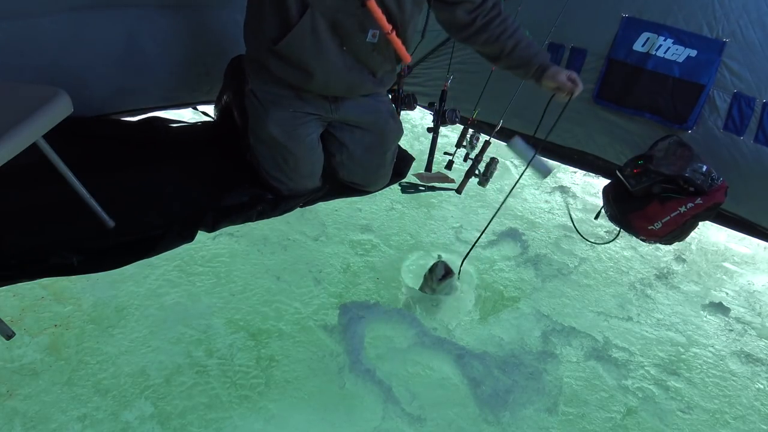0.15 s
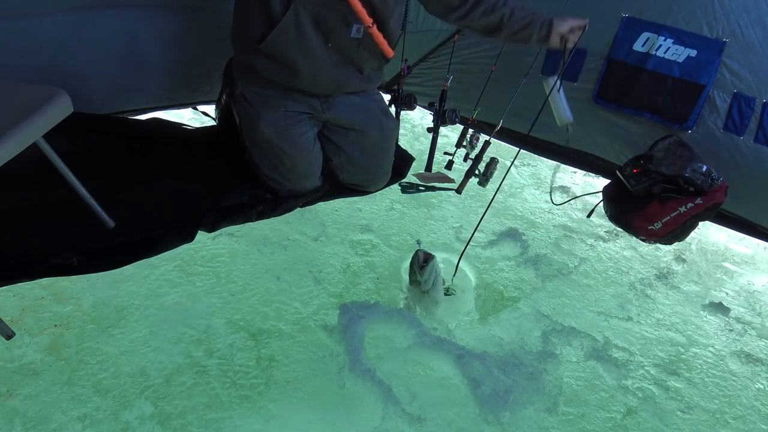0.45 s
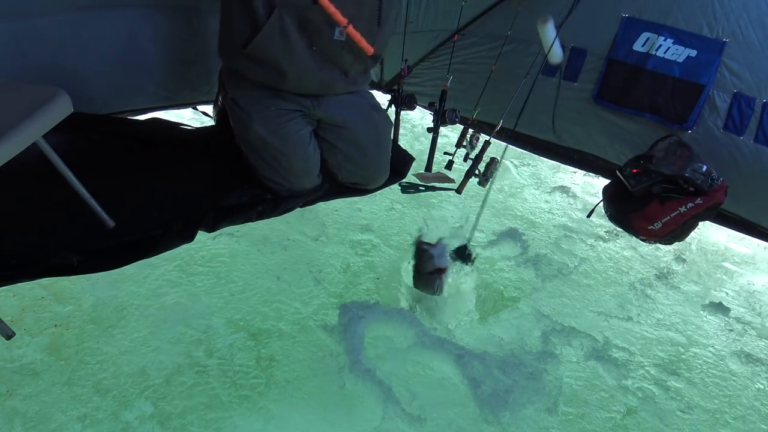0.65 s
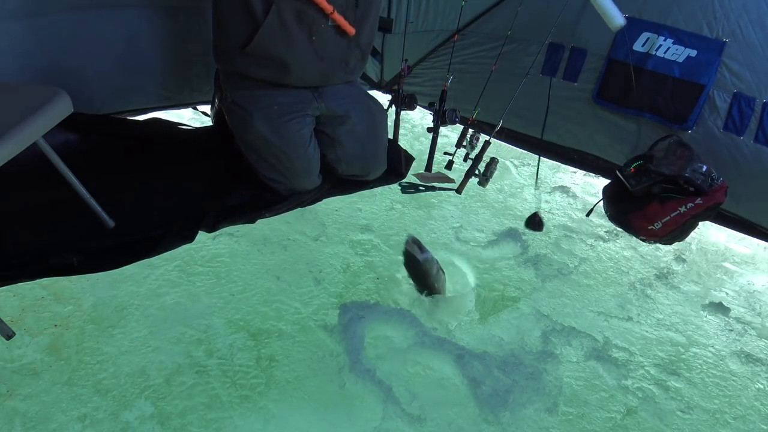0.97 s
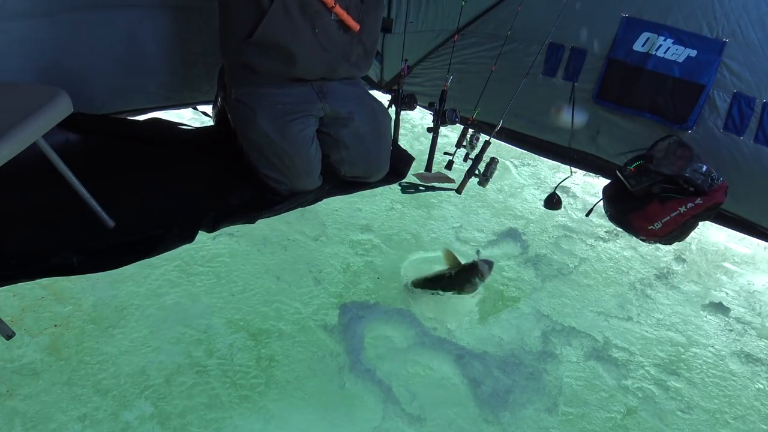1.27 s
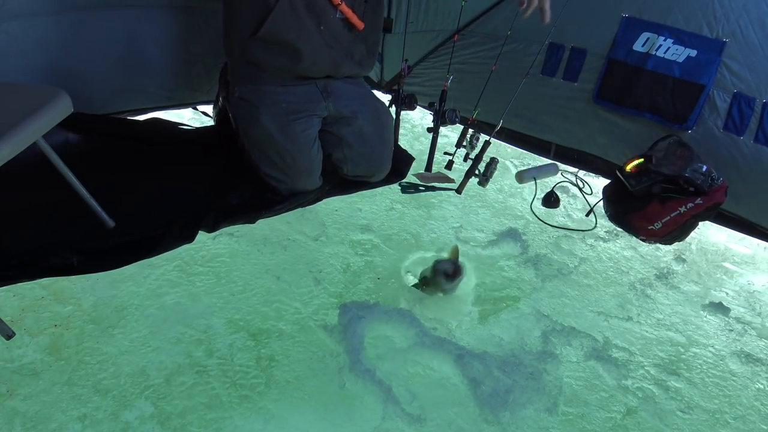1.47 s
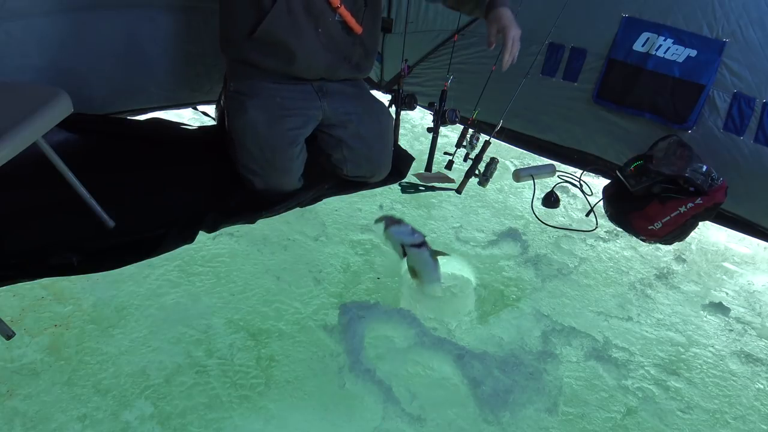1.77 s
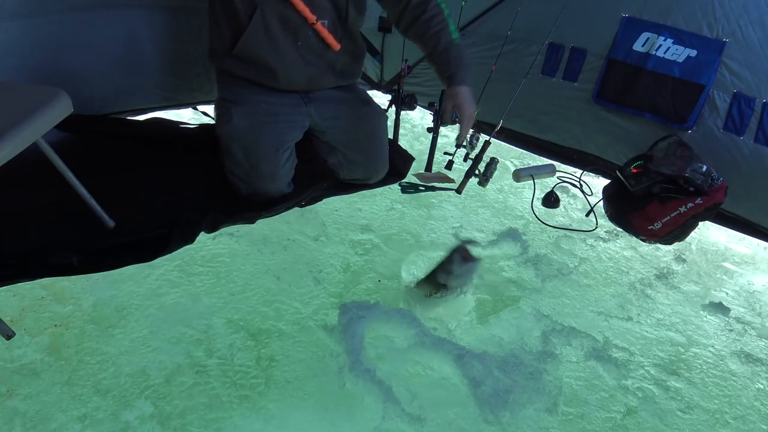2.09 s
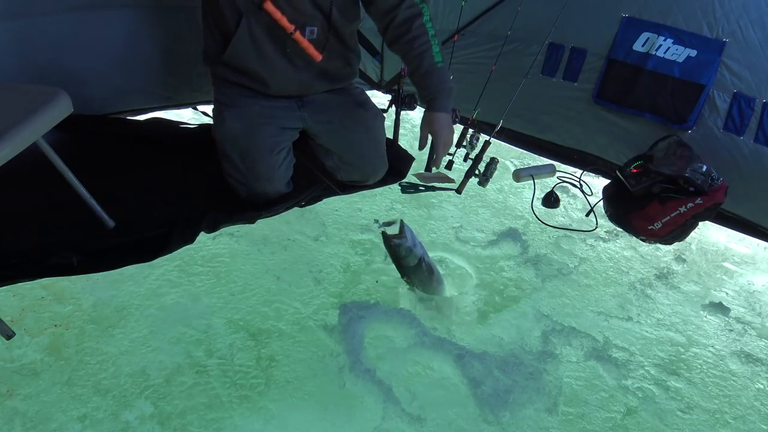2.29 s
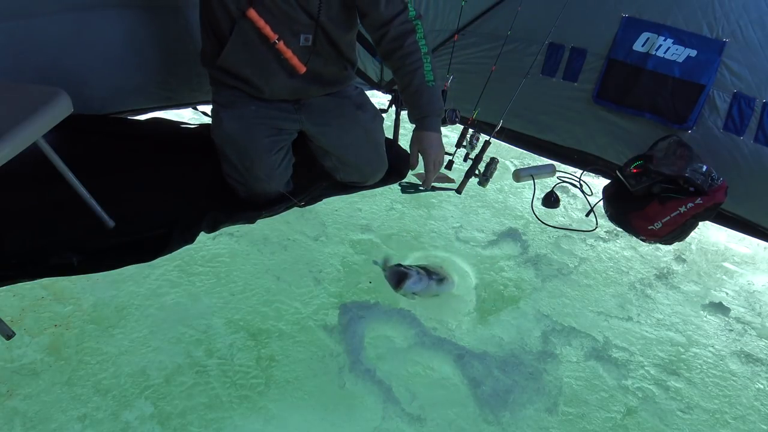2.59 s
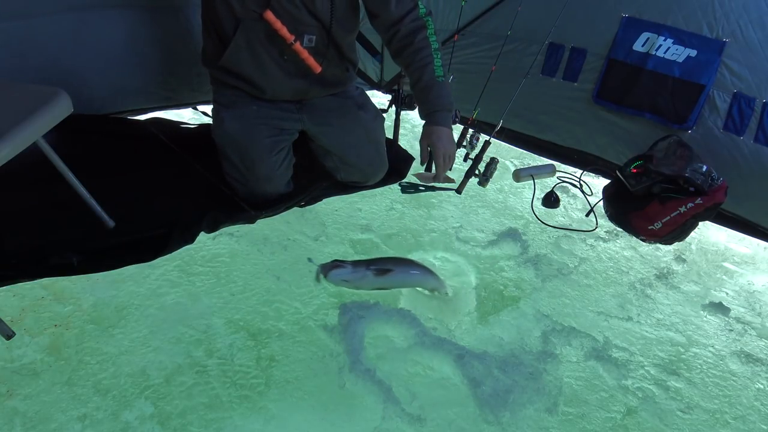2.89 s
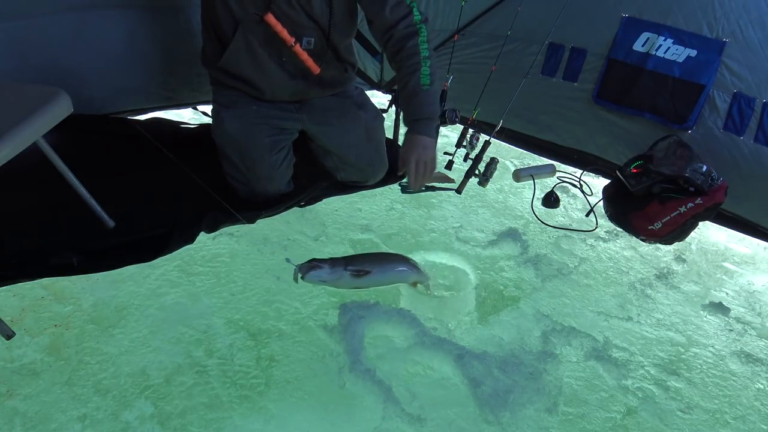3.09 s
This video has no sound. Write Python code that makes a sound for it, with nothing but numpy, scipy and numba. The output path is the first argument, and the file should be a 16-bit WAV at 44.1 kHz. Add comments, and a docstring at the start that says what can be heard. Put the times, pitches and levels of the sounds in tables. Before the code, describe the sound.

A large fish thrashes in an ice hole inside a small fabric shelter. A line swishes and briefly sings, then water sloshes, gurgles and sprays as the fish slaps repeatedly on wet ice, heard close over a faint low rumble.

```python
"""A large fish is hauled up through a hole in the ice and flops about inside a fabric shelter.
The line swishes and sings, water sloshes and gulps in the hole, and spray patters down.
The fish slaps and thumps on the wet ice, air pockets squelch as they are squeezed, and tackle clinks.
The wet textures are clouds of tiny ringing bubbles and droplets; a low rumble lies under it all."""
import sys
import numpy as np
from scipy import signal
from scipy.fft import rfft, irfft, next_fast_len
from scipy.io import wavfile
from numba import njit

SR = 44100
rng = np.random.default_rng(int(sys.argv[2]) if len(sys.argv) > 2 else 0)


def file_out(sig):
    """Save sig as 16-bit WAV at sys.argv[1]."""
    # one column per channel
    cols = np.atleast_2d(sig).T
    # limit, then scale
    lim = np.clip(cols, -1, 1)
    pcm = np.round(lim * 32767).astype(np.int16)
    wavfile.write(sys.argv[1], SR, pcm)


N = 143325
T = np.arange(N) / SR

# Fader rides: time_s, level_db
SLOSH_RIDE = [(0, -37.5), (.1, -54), (.3, -31), (.48, -30), (.58, -32), (.68, -25), (.8, -29), (.92, -27),
              (1.02, -32.5), (1.25, -41.5), (1.6, -40), (1.85, -40.5), (2.0, -34.5), (2.17, -51),
              (2.42, -44), (2.8, -46), (3.1, -43), (3.25, -51)]  # water in the hole
SLUSH_RIDE = [(0, -38.5), (.04, -57), (.2, -42), (.45, -44), (.63, -37), (.72, -47), (.82, -33.5),
              (.88, -34), (.92, -26), (1.17, -32.5), (1.43, -40), (1.52, -37), (1.89, -41), (1.97, -32.5),
              (2.45, -43.5), (2.72, -52), (2.81, -59), (2.99, -47.5), (3.08, -34.5), (3.25, -48)]  # slush around the fish
SPRAY_RIDE = [(0, -41.5), (.05, -49), (.2, -51), (.45, -49), (.6, -44.5), (.87, -39.5), (1.0, -33),
              (1.1, -27.5), (1.22, -35.5), (1.33, -36.5), (1.445, -42.5), (1.5, -31), (1.6, -38.5),
              (1.76, -50), (2.12, -44.5), (2.65, -49.5), (2.82, -58.5), (3.1, -48.5), (3.25, -45.5)]  # fine spray falling back
DRONE_RIDE = [(0, -55.5), (1.9, -48.5), (2.3, -46), (2.62, -37), (2.9, -40), (3.25, -50)]  # the low drone's swell
SING_RIDE = [(.2, -56), (.39, -37), (.52, -33.5), (.63, -32.5), (.72, -54), (.9, -110)]  # taut line and rod

# EQ curves that colour each texture: frequency_hz, gain_db
RUMBLE_EQ = [(20, -8), (32, 4), (45, -6), (65, -1.5), (84, -1.5), (103, 7.5), (125, 3), (160, -6.5),
             (220, -6), (500, -13), (1500, -52), (15000, -62)]
SLOSH_EQ = [(120, -12), (220, -14.5), (285, -9), (400, -3.5), (520, -1), (820, 2.5), (1000, 2), (1150, 1.5),
            (1400, -3), (1850, -8), (2400, -14), (4000, -70)]
SLUSH_EQ = [(700, -3), (1600, 8), (2400, 6), (3300, 10.5), (4300, 4), (5400, 1.5), (7000, -12.5),
            (16000, -51)]
SPRAY_EQ = [(1500, -42), (3500, 0), (5200, 7), (7000, 2.5), (9000, 0.5), (12500, -1.5), (16000, -8)]
SWISH_EQ = [(120, -8), (220, -12.5), (450, -8.5), (850, -3.5), (1250, -3), (1900, -4), (2600, -4),
            (3400, -3), (4400, -7), (5400, -7), (7000, -15), (8700, -16), (10500, -19), (15500, -25)]
BODY_EQ = [(100, -52), (240, -12), (330, -8), (500, 1.5), (850, 6.5), (1400, -0.5), (2200, 2.5),
           (4000, -36)]
SMACK_EQ = [(600, -51), (1300, -5), (2100, 0.5), (3200, 6), (4400, -0.5), (5500, -2.5), (7000, -12.5),
            (16000, -72)]
FIZZ_EQ = [(1500, 4.5), (2500, -9), (3500, 12), (5300, -21), (8000, -4), (10000, -19)]
DRIP_EQ = [(3000, -21), (5500, 3.5), (8300, 6), (11000, -8.5), (16000, -11)]
DROP_EQ = [(1000, -23), (5000, -10), (9000, 5.5), (13000, 2), (16000, -1)]

# Air rings in the water and under the fish:
# start_s, pitch_hz, level_db, swell_s, decay_s, glide_octaves_per_s
AIR_POCKETS = [(.002, 1630, -35, 0.0088, 0.013, -4), (0.072, 3110, -29.5, 0.0033, 0.028, 0.5),
               (0.186, 1270, -24, 0.0051, 0.0086, -8.5), (0.224, 399, -28.5, 0.0051, 0.0097, 4),
               (.604, 760, -24.5, 0.0037, 0.0099, 2.5), (.652, 1054, -16.5, 0.0046, 0.0055, 16),
               (.652, 2404, -14, 0.0018, 0.0075, -3), (0.684, 958, -11.5, 0.0049, 0.0016, 4),
               (.695, 799, -10.5, 0.0013, 0.0083, -3), (.692, 2970, -20, 0.0052, 0.0063, 0),
               (0.712, 5100, -17.5, 0.0007, 0.0045, 7), (0.719, 1120, -16, 0.003, 0.0044, 11),
               (0.728, 2760, -15, 0.0021, 0.0042, -17), (0.741, 900, -6.5, 0.00066, 0.0017, -12),
               (0.756, 950, -11, 0.0055, 0.0071, -4), (0.877, 1197, -21, .003, 0.0051, 3),
               (.892, 1940, -18, 0.0018, 0.0039, -1), (.893, 3710, -19, 0.0017, 0.005, -1),
               (1.055, 742, -12.5, 0.0018, 0.0065, 14), (1.077, 880, -24, 0.0052, 0.01, 7),
               (1.137, 2834, -14.5, 0.0022, 0.0077, 4), (1.339, 948, -27.5, 0.014, 0.011, 1),
               (1.650, 2113, -24.5, 0.0069, 0.026, -3), (1.67, 1365, -20.5, 0.0072, 0.0075, -10.5),
               (1.911, 812, -16.5, 0.003, 0.0092, -15), (1.915, 805, -13, 0.017, 0.01, 2),
               (1.929, 2780, -15, 0.00093, 0.0052, 10), (1.932, 3250, -19.5, 0.0024, 0.0067, 7),
               (1.944, 818, -22, 0.0057, 0.011, 1.5), (2.020, 1120, -27, 0.017, .02, -1.5),
               (2.047, 1117, -19, .008, 0.032, 6.5), (2.072, 1244, -12, 0.0049, 0.0034, -3),
               (2.08, 1003, -16.5, 0.0019, 0.014, 4.5), (2.2025, 781, -30, 0.0029, 0.022, -1),
               (2.206, 1586, -28, 0.01, 0.013, -0.5), (2.264, 1276, -24.5, 0.0014, 0.052, 2),
               (2.311, 1760, -20.5, 0.0025, 0.011, -0.5), (2.3343, 1150, -13.5, 0.0008, 0.0071, 1.5),
               (2.349, 1155, -19.5, 0.011, 0.015, -4.5), (2.517, 1222, -23.5, 0.0062, 0.012, 2),
               (2.543, 3600, -30, .002, .008, 2), (2.621, 696, -10.5, 0.0055, 0.0068, 5.5),
               (2.647, 710, -21, 0.0073, 0.0092, -1), (2.682, 2010, -17, 0.0011, 0.013, -0.5),
               (2.688, 1543, -23, 0.0039, 0.013, -2.5), (2.713, 318, -36, 0.0048, 0.025, 1),
               (2.719, 2510, -24, 0.0016, 0.011, -3.5), (2.863, 467, -33, 0.011, 0.012, -11)]
# The fish hits water or wet ice: start_s, rise_s, decay_s, body_db, smack_db, spray_db
FISH_SLAPS = [(0.073, 0.0022, 0.044, -38, -31, -40), (.203, 0.0056, 0.033, -45, -47, -27),
              (0.58, 0.0048, 0.028, -26.5, -33, -57), (0.651, 0.0025, 0.078, -38, -21, -32.5),
              (0.6874, 0.0012, 0.033, -26.5, -37, -33), (0.695, 0.00077, 0.0016, -24, -27, -32),
              (0.743, 0.0013, 0.0033, -23, -15.5, -41), (0.755, 0.0015, 0.0083, -36, -40, -32),
              (0.894, 0.0011, 0.044, -26, -29.5, -51), (0.938, 0.0034, 0.026, -26, -35, -36),
              (1.01, 0.0012, 0.0061, -37, -22.5, -20.5), (1.043, 0.002, 0.032, -28.5, -30, -17.5),
              (1.05, 0.004, 0.0099, -29, -20.5, -21.5), (1.138, 0.003, 0.025, -32.5, -19.5, -25),
              (1.188, 0.0041, 0.063, -63, -32.5, -28), (1.335, 0.0052, 0.019, -39, -25.5, -51),
              (1.4484, 0.0021, 0.0043, -18, -19, -18), (1.45, 0.0011, 0.044, -26, -22, -22),
              (1.537, 0.012, 0.0029, -43, -54, -29), (1.667, 0.01, 0.03, -33, -34.5, -42),
              (1.849, 0.0035, 0.022, -31, -36, -63), (1.931, 0.0004, 0.0014, -20, -13.5, -33),
              (1.932, 0.0011, 0.026, -23.5, -30.5, -52), (2.043, .003, 0.035, -55, -26.5, -46),
              (2.077, 0.0034, 0.0019, -11.5, -17.5, -18.5), (2.084, 0.0064, 0.023, -22.5, -26.5, -25),
              (2.171, .003, 0.047, -36, -66, -54), (2.202, 0.0017, 0.0068, -28, -52, -68),
              (2.263, 0.0018, 0.045, -62, -28, -50), (2.28, 0.0033, 0.042, -58, -33, -41.5),
              (2.307, 0.0035, 0.05, -40, -40, -34.5), (2.3315, 0.0008, 0.0022, -48, -30, -48),
              (2.389, 0.013, 0.037, -32.5, -37.5, -46), (2.505, .003, 0.0078, -65, -31.5, -50),
              (2.541, 0.0023, 0.011, -33.5, -37, -60), (2.612, 0.0073, 0.061, -38, -34.5, -38),
              (2.682, 0.00073, 0.02, -24, -24, -37), (2.851, 0.031, 0.04, -37, -44, -46.5),
              (3.110, 0.018, 0.018, -54, -31, -60)]
# Small metal tackle clinks: start_s, pitch_hz, level_db
TACKLE_CLINKS = [(0.0747, 12450, -29), (1.636, 10400, -26.5), (1.6464, 10400, -29.5)]
# Modes of the taut line and rod: pitch_hz, relative_db
LINE_MODES = [(280, -9), (835, -6), (1152, -1.5), (1600, -19), (1820, -10), (2170, -12), (2690, -15),
              (3290, -6)]
# Single drops land: start_s, relative_db
DROP_HITS = [(0.518, -21.5), (.745, -17), (1.410, -24), (1.476, -17), (1.547, -10.5), (1.647, -16),
             (1.869, -29), (1.912, -21), (2.050, -28), (2.0759, -11), (2.079, -13), (2.492, -30),
             (2.559, -16), (2.771, -38), (2.868, -37), (2.968, -34), (3.009, -28)]
# Water is sucked through a changing gap: start_s, length_s, start_hz, end_hz, level_db
GAP_GURGLES = [(0.647, 0.08, 1132, 935, -21), (0.74, 0.041, 953, 892, -19),
               (0.798, 0.093, 1145, 1916, -30.5), (1.053, 0.052, 782, 950, -24),
               (1.643, 0.046, 2206, 1076, -31.5), (1.925, 0.056, 861, 657, -28.5),
               (1.967, 0.041, 795, 1584, -33), (2.063, 0.018, 1255, 2093, -19.5),
               (2.083, 0.0554, 772, 1103, -24.5), (2.26, 0.034, 1496, 1362, -26),
               (2.344, 0.11, 1228, 806, -32), (2.491, 0.089, 1609, 1159, -40),
               (2.839, 0.073, 425, 694, -33.5)]
# The body lands flat on the ice: start_s, pitch_hz, level_db
BODY_THUMPS = [(1.451, 272, -20.5), (1.827, 400, -33), (1.941, 427, -24), (3.075, 302, -39.5)]
# Early reflections off ice and walls: delay_s, gain_db
REFLECTIONS = [(.0061, -28.5), (0.0117, -19.5), (0.02, -18)]


def from_db(db):
    """Decibels to gain."""
    return 10 ** (np.asarray(db) / 20)


def rms_one(x):
    """Scale to unit rms."""
    return x / np.sqrt(np.mean(x ** 2) + 1e-20)


def fader(ride):
    """Gain over time along a fader ride."""
    return from_db(np.interp(T, *np.transpose(ride)))


def colour(x, eq):
    """Shape a texture with an EQ curve; rms 1."""
    hz, db = np.transpose(eq)
    size = next_fast_len(N)
    bins_hz = np.maximum(np.fft.rfftfreq(size, 1 / SR), 1)
    gain = from_db(np.interp(np.log(bins_hz), np.log(hz), db))
    return rms_one(irfft(rfft(x, size) * gain, size)[:N])


def drift(rate_hz):
    """A smooth random modulator; rms 1."""
    return rms_one(signal.sosfilt(signal.butter(2, rate_hz, fs=SR, output="sos"), rng.standard_normal(N)))


def resonance(hz, width_hz):
    """A narrow band of noise around a steady or moving pitch; rms about 1."""
    phase = 2 * np.pi * np.cumsum(hz * np.ones(N)) / SR
    return drift(width_hz) * np.cos(phase) + drift(width_hz) * np.sin(phase)


def burst(start, rise, decay):
    """Envelope: a straight attack, then an exponential decay."""
    age = T - start
    return np.clip(age / rise, 0, 1) * np.exp(-np.clip((age - rise) / decay, 0, 50))


@njit
def pings(starts, gains, phase_steps, cycles, chirp, size):
    """Sines that fall to 1/e in `cycles` periods; `chirp` bends their pitch upward."""
    out = np.zeros(size)
    for k in range(len(starts)):
        life = cycles * 2 * np.pi / phase_steps[k]
        gain, loss = gains[k], np.exp(-1 / life)
        for i in range(min(int(5 * life), size - starts[k])):
            out[starts[k] + i] += gain * np.sin(phase_steps[k] * i * (1 + chirp * i / life))
            gain *= loss
    return out


def grains(eq, per_s, cycles, spread_db, hiss_db, chirp=0.02):
    """Tiny bubbles and droplets of random size and pitch on a bed of hiss; rms 1."""
    sizes = from_db(spread_db * np.minimum(rng.exponential(1, N), 4)) * rng.choice([-1, 1], N)
    hz = np.minimum(rng.uniform(np.sqrt(eq[0][0]), np.sqrt(eq[-1][0]), N) ** 2, SR / 2)
    starts = np.flatnonzero(rng.random(N) < per_s / SR)
    phase_steps = 2 * np.pi * hz[starts] / SR
    rings = pings(starts, (sizes * hz)[starts], phase_steps, float(cycles), float(chirp), N)
    return rms_one(colour(rings, eq) + from_db(hiss_db) * colour(rng.standard_normal(N), eq))


def low_bed():
    """A steady rumble and a wavering drone that swells near the end."""
    rumble = from_db(-44) * colour(rng.standard_normal(N), RUMBLE_EQ)
    return rumble + fader(DRONE_RIDE) * resonance(hz=84, width_hz=14)


def water():
    """Water sloshes in the hole, slush crackles and fine spray falls back."""
    slosh = grains(SLOSH_EQ, per_s=1500, cycles=11.2, spread_db=5.5, hiss_db=1)
    fits = from_db(-1.5 * drift(25.4))  # the slush gives way in small fits
    slush = fits * grains(SLUSH_EQ, per_s=2000, cycles=12, spread_db=1.5, hiss_db=-7)
    spray = grains(SPRAY_EQ, per_s=3000, cycles=11, spread_db=2, hiss_db=5.5)
    return fader(SLOSH_RIDE) * slosh + fader(SLUSH_RIDE) * slush + fader(SPRAY_RIDE) * spray


def air_pockets():
    """Trapped air rings with a faint octave, gliding and wobbling as the pocket is squeezed."""
    clean_below_hz = 1150  # larger, lower pockets ring more cleanly
    wobble, roughness = .045 * drift(127), .33 * drift(330)
    out = np.zeros(N)
    for start, hz, db, swell, decay, glide in AIR_POCKETS:
        span = slice(int(start * SR), int(start * SR) + SR // 10)
        unrest = min(hz / clean_below_hz, 1) ** 2
        pitch_hz = hz * 2 ** (glide * (T[span] - start)) * (1 + unrest * wobble[span])
        phase = 2 * np.pi * np.cumsum(pitch_hz) / SR
        tone = np.sin(phase) + from_db(-34) * np.sin(2 * phase)
        envelope = burst(start, swell, decay)[span] * (1 + unrest * roughness[span])
        out[span] += from_db(db) * envelope * tone
    return out


def line_swish():
    """The pull on the line: one swish that swells quickly and fades more slowly."""
    peak_s, rise_s, fall_s = .21, .098, .17
    width_s = np.where(T < peak_s, rise_s, fall_s)
    envelope = from_db(-24) * np.exp(-((T - peak_s) / width_s) ** 2)
    return envelope * grains(SWISH_EQ, per_s=5000, cycles=2.1, spread_db=1, hiss_db=-1)


def fish_slaps():
    """Each blow layers a hollow body, a wet smack, a burst of spray and a fizz of small ringing bubbles."""
    body = grains(BODY_EQ, per_s=5000, cycles=.91, spread_db=3, hiss_db=-16)
    smack = grains(SMACK_EQ, per_s=5000, cycles=2.3, spread_db=1, hiss_db=-5)
    spray = grains(SPRAY_EQ, per_s=2800, cycles=.2, spread_db=-5.5, hiss_db=-31)
    fizz = grains(FIZZ_EQ, per_s=440, cycles=5.6, spread_db=6, hiss_db=-12)
    out = np.zeros(N)
    for start, rise, decay, body_db, smack_db, spray_db in FISH_SLAPS:
        blow = from_db(body_db) * body + from_db(smack_db) * smack + from_db(spray_db) * spray
        out += burst(start, rise, decay) * blow
        out += burst(start, rise=.032, decay=.013) * from_db(smack_db - 13) * fizz
    return out


def thrown_drips():
    """Droplets plink on the ice at steady pitches; louder, longer smacks throw a louder shower."""
    flight_s = .024
    power = np.zeros(N)
    for start, _, slap_decay, _, smack_db, _ in FISH_SLAPS:
        shower = from_db(smack_db - 24.5) * burst(start, rise=flight_s, decay=.052)
        power += slap_decay / flight_s * shower ** 2
    return np.sqrt(power) * grains(DRIP_EQ, per_s=270, cycles=27, spread_db=-1, hiss_db=-16, chirp=0)


def tackle_clinks():
    """Small metal tackle rings high with a rough shimmer and leaves a faint tail."""
    ring_s = .0063
    out = np.zeros(N)
    for start, hz, db in TACKLE_CLINKS:
        strike = burst(start, rise=.00032, decay=ring_s)
        tail = from_db(-17) * burst(start, rise=ring_s, decay=.043)
        out += from_db(db) * (strike + tail) * np.sin(2 * np.pi * hz * T)
    return out * (1 + .87 * drift(220))


def line_sing():
    """The taut line and rod sing, each mode fluttering on its own in level and pitch."""
    flutter_hz, wander_hz = 50, 14
    out = np.zeros(N)
    for hz, db in LINE_MODES:
        flutter = 1 + .45 * drift(flutter_hz)
        pitch_hz = hz + wander_hz * drift(flutter_hz)
        out += from_db(db) * flutter * np.sin(2 * np.pi * np.cumsum(pitch_hz) / SR)
    return fader(SING_RIDE) * rms_one(out)


def single_drops():
    """Each drop lands with a short, bright click."""
    envelope = sum(from_db(db) * burst(start, rise=.0002, decay=.0009) for start, db in DROP_HITS)
    return envelope * colour(rng.standard_normal(N), DROP_EQ) / 2


def gurgles():
    """A turbulent resonance slides as the gap around the fish narrows or widens."""
    out = np.zeros(N)
    for start, length, start_hz, end_hz, db in GAP_GURGLES:
        progress = np.clip((T - start) / length, 0, 1)
        arch = np.sqrt(np.abs(np.sin(np.pi * progress)))
        pitch_hz = start_hz + (end_hz - start_hz) * progress
        out += from_db(db) * arch * resonance(pitch_hz, width_hz=.13 * start_hz)
    return out


def body_thumps():
    """The fish's weight lands on the ice with dull knocks."""
    return sum(from_db(db) * burst(start, rise=.0037, decay=.0078) * np.sin(2 * np.pi * hz * (T - start))
               for start, hz, db in BODY_THUMPS)


def shelter(x):
    """A tight space: a few near reflections and a short diffuse tail."""
    t60_s, build_s, tail_db = .22, .011, -11
    t = T[:SR // 2]
    tail = rng.standard_normal(len(t)) * from_db(-60 * t / t60_s) * np.clip(t / build_s, 0, 1)
    damping = signal.butter(1, 9000, fs=SR, output="sos")
    response = signal.sosfilt(damping, tail / np.linalg.norm(tail)) * from_db(tail_db)
    for delay, db in REFLECTIONS:
        response[int(delay * SR)] += from_db(db)
    return x + signal.fftconvolve(x, response)[:N]


def scene():
    """Fish, water and tackle in the shelter, over the low bed; mono."""
    fish = fish_slaps() + body_thumps()
    wet = air_pockets() + gurgles() + water() + thrown_drips()
    gear = line_swish() + line_sing() + tackle_clinks()
    return (shelter(fish + wet + gear + single_drops()) + low_bed())[None]


def record(dry):
    """A soft clip rounds the highest peaks and a steep low-pass cuts the very top."""
    ceiling, cutoff_hz = .68, 15900
    rounded = dry / (1 + (dry / ceiling) ** 4) ** .25
    return signal.sosfilt(signal.ellip(12, .1, 90, cutoff_hz, fs=SR, output="sos"), rounded)


dry = scene()
out = record(dry)
file_out(out)
```